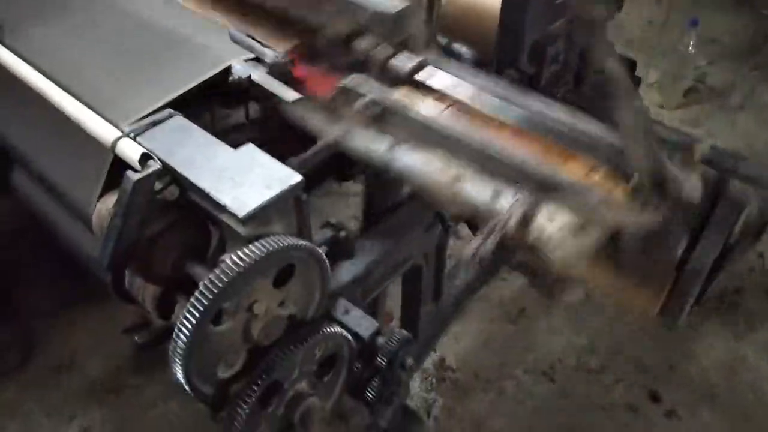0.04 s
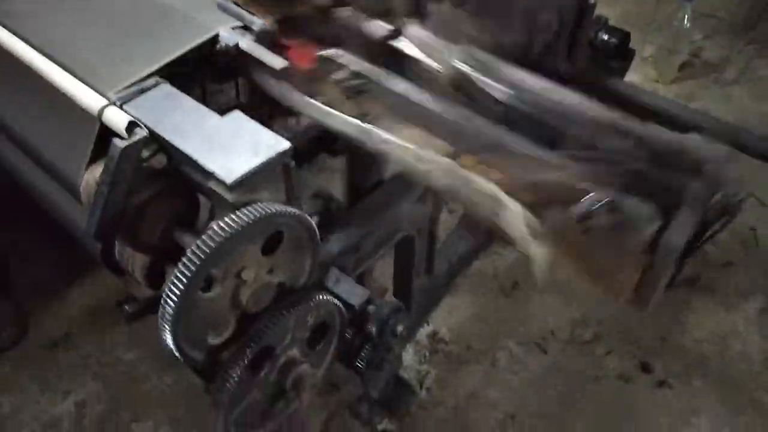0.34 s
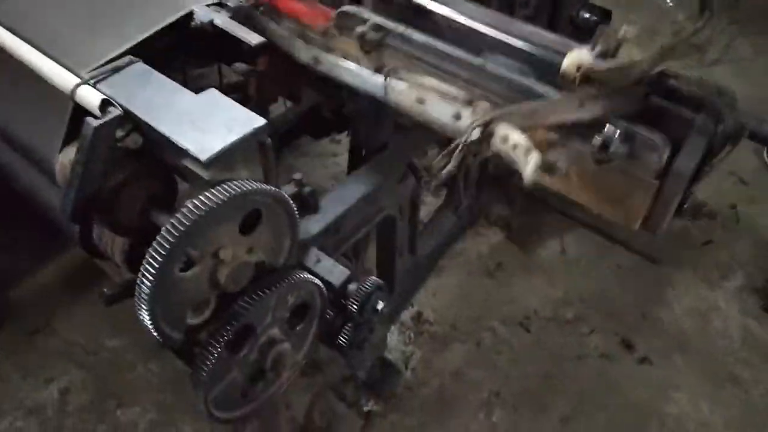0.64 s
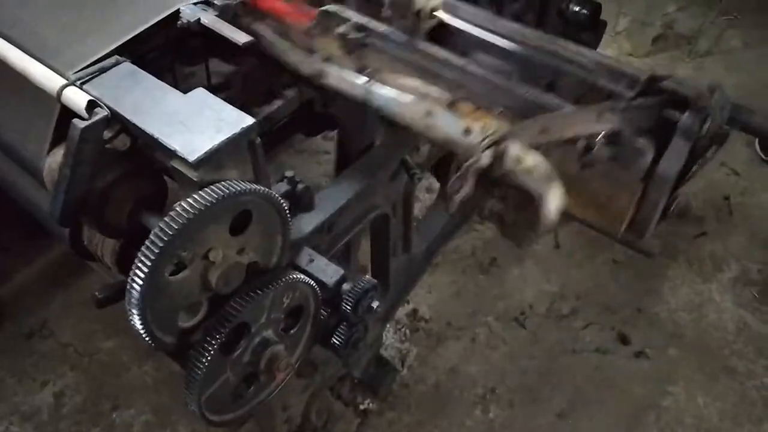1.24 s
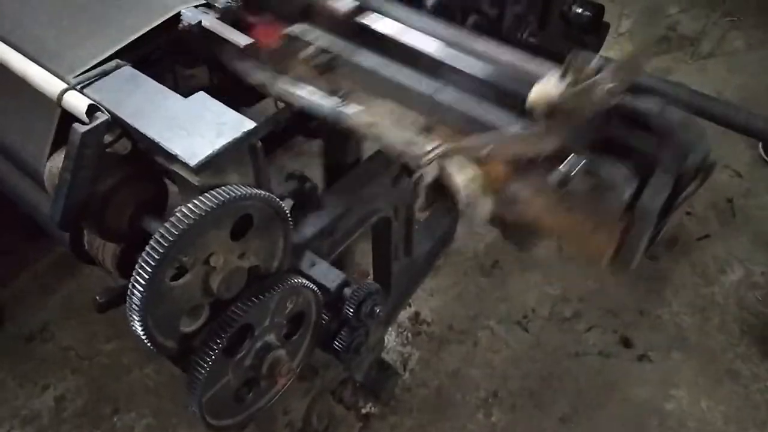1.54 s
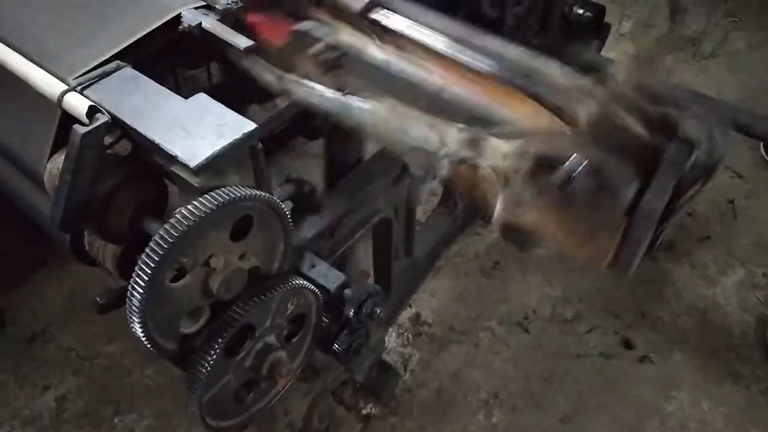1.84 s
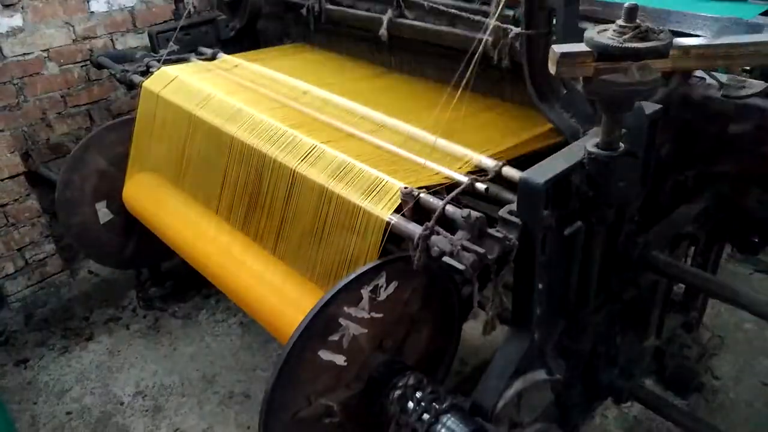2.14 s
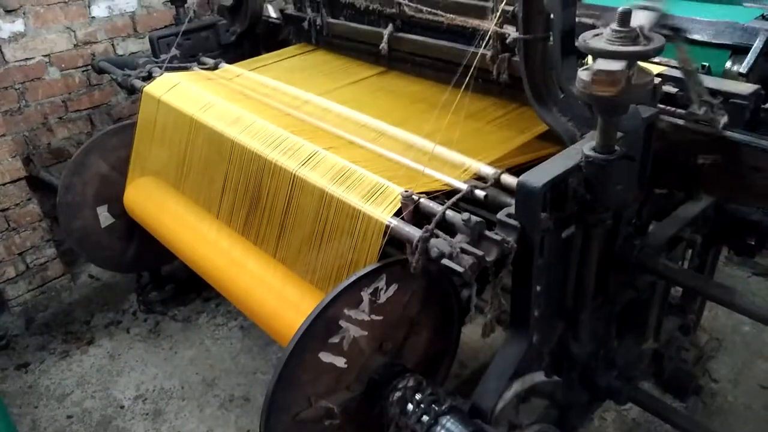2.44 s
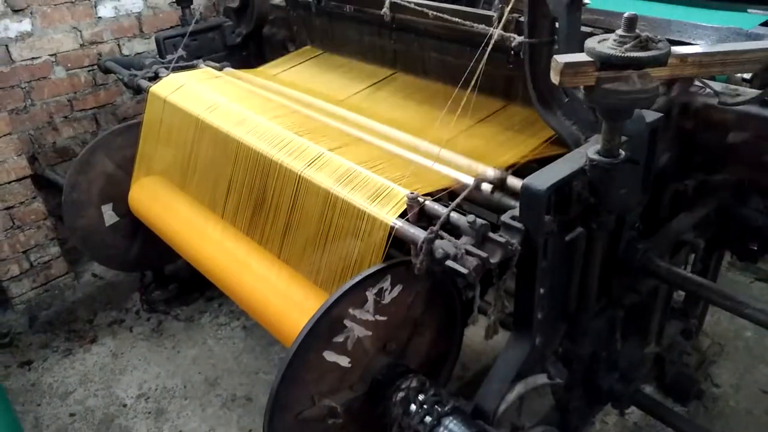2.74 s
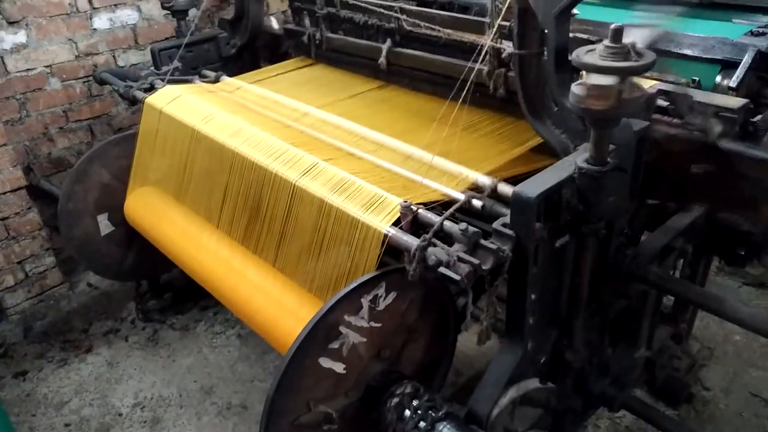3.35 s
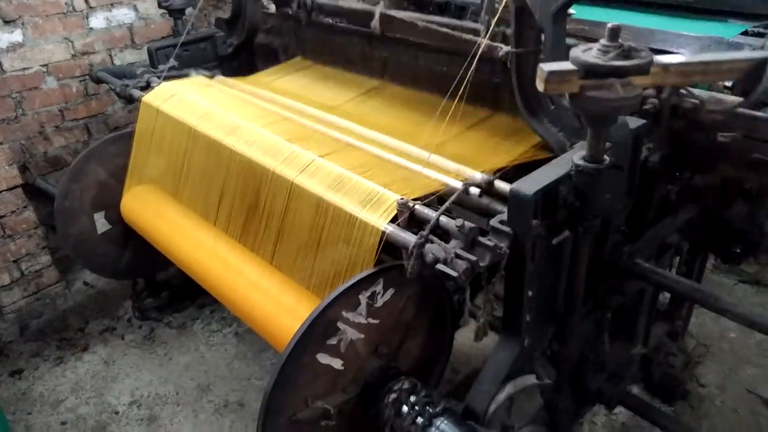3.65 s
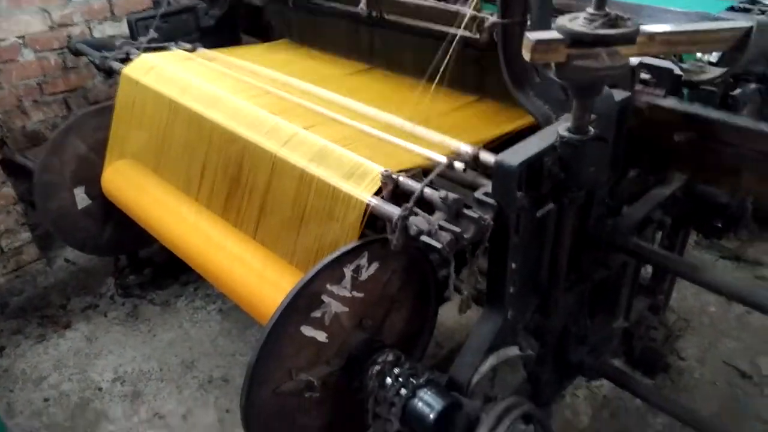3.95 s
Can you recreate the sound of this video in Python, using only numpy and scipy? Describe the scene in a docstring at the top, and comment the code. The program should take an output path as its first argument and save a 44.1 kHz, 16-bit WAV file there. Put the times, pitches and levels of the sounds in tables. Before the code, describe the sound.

Power looms clatter loudly in a workshop, cutting out briefly before the clatter resumes.

```python
"""Two shuttle looms clatter in a hard-walled weaving shed, one after the other, a short silence between.
Each pick, about two a second, is a round of clacks from picking sticks, shuttle and sley, with steel
pings, shuttle-box clanks and frame thumps, over loose heddles and the din of the other machines.
The microphone rings in the treble and overloads; at the second loom its right side is muffled."""
import sys
import numpy as np
from scipy import signal
from scipy.fft import rfft, irfft, next_fast_len
from scipy.io import wavfile
from scipy.ndimage import map_coordinates

SR = 44100
rng = np.random.default_rng(int(sys.argv[2]) if len(sys.argv) > 2 else 0)


def persist_wave(psi):
    """Save psi, clipped to +-1, as 16-bit WAV."""
    counts = np.round(np.clip(psi, -1, 1) * 32767).astype(np.int16)
    wavfile.write(sys.argv[1], SR, np.atleast_2d(counts).T)


N = 176400
SECOND_LOOM_S = 2.1


def amp(db):
    """Decibels to gain."""
    return 10 ** (np.asarray(db) / 20)


def unit(x):
    """Scale to rms 1."""
    return x / np.sqrt(np.mean(x ** 2) + 1e-20)


def clock():
    """Sample times in seconds."""
    return np.arange(N) / SR


def add(out, start_s, sound):
    """Mix a stereo sound into out."""
    part = out[:, int(start_s * SR):][:, :sound.shape[1]]
    part += sound[:, :part.shape[1]]


def along(points, hz):
    """Interpolate (freq_hz, value) points on a log axis."""
    freq_hz, values = np.transpose(points)
    return np.interp(np.log(hz + 1), np.log(freq_hz + 1), values)


def filtered(x, response):
    """Apply response(hz) by FFT."""
    size = next_fast_len(N + SR // 2)
    return irfft(rfft(x, size) * response(np.fft.rfftfreq(size, 1 / SR)), size)[..., :N]


def broad(points):
    """Smooth response through (freq_hz, gain_db) points."""
    return lambda hz: amp(along(points, hz))


def ribbed(points, ripple_db, spacing_hz):
    """Broad response with crowded, irregular resonances."""
    knots = rng.standard_normal(2000)
    ripple = lambda hz: map_coordinates(knots, [hz / spacing_hz], mode="mirror")
    return lambda hz: amp(along(points, hz) + ripple_db * ripple(hz))


def resonant(modes):
    """Response of resonances summed in power."""
    return lambda hz: np.sqrt(sum(
        np.abs(amp(db) * hz * width_hz / (centre_hz ** 2 - hz ** 2 + 1j * hz * width_hz)) ** 2
        for centre_hz, width_hz, db in modes))


def diffuse(response):
    """Reverberant stereo noise, rms 1, alike on both sides only in the bass."""
    # freq_hz, left_right_correlation
    likeness = [(60, 0.78), (130, 0.83), (290, 0.57), (640, 0.43), (1410, -0.2), (3100, 0.066),
                (7000, -0.015)]

    def mid_side(hz):
        angle = np.arccos(np.clip(along(likeness, hz), -1, 1)) / 2
        return response(hz) * np.array([np.cos(angle), np.sin(angle)])

    mid, side = filtered(rng.standard_normal((2, N)), mid_side)
    return unit(np.array([mid + side, mid - side]))


def blurred(pitch_hz, width_hz, t):
    """Stereo tone, rms 1, wandering in strength and phase."""
    knots = rng.standard_normal((2, 800)) + 1j * rng.standard_normal((2, 800))
    wander = np.array([np.interp(t * width_hz, np.arange(len(side)), side) for side in knots])
    return unit(np.real(wander * np.exp(2j * np.pi * pitch_hz * t)))


def strike(age_s, attack_s, t60_s):
    """Envelope of one blow building up and dying away."""
    return (1 - np.exp(-age_s / attack_s)) * np.exp(-np.log(1000) * age_s / t60_s)


def ring(pitch_hz, width_hz, attack_s, t60_s):
    """One struck mode, blurred by the shed's echoes."""
    t = np.arange(SR // 4) / SR
    return blurred(pitch_hz, width_hz, t) * strike(t, attack_s, t60_s)


def blows(starts_s, levels_db, attack_s, t60_s):
    """Envelope of many blows; powers add."""
    power, t = np.zeros(N), clock()
    for start_s, level_db in zip(starts_s, levels_db):
        first = max(int(start_s * SR), 0)
        span = slice(first, first + SR // 2)
        age_s = np.maximum(t[span] - start_s, 0)
        power[span] += (amp(level_db) * strike(age_s, attack_s, t60_s)) ** 2
    return np.sqrt(power)


def struck(starts_s, levels_db, spectrum, attack_s, t60_s, parts):
    """Blows land on several parts in turn, each with its own resonances."""
    out = np.zeros((2, N))
    for k in range(parts):
        envelope = blows(starts_s[k::parts], levels_db[k::parts], attack_s, t60_s)
        out += envelope * diffuse(ribbed(spectrum, ripple_db=2.5, spacing_hz=172.3))
    return out


def rattle(rate_per_s=150, t60_s=0.04, spread_db=1.5, share=0.28):
    """Envelope, rms 1, of small random contacts between loose parts."""
    contacts = (rng.random(N) < rate_per_s / SR) * amp(spread_db * rng.standard_normal(N)) ** 2
    decay = np.exp(-2 * np.log(1000) * clock()[:SR // 4] / t60_s)
    power = np.abs(signal.fftconvolve(contacts, decay)[:N])
    return np.sqrt(1 - share + share * power / power.mean())


def shed():
    """Gears and other looms merge into a rattling din over the drive's wavering hum."""
    # din around each loom: freq_hz, density_db
    first_spectrum = [(25, -26.5), (45, -24.5), (80, -5.5), (115, 1.5), (160, -4), (400, -2), (800, .5),
                      (1400, 0.5), (2400, 0.5), (4000, -4), (6000, -8.5), (8500, -6.5), (12000, -14),
                      (15500, -22.5)]
    second_spectrum = [(25, -24), (45, -9), (80, -5), (120, -1.5), (200, -2), (430, 0.5), (750, -2),
                       (1200, 2.8), (2000, 1), (2900, 2.5), (5000, -4), (8200, -3.5), (12000, -11.5),
                       (15500, -16.5)]
    ripple_db, spacing_hz = 1.5, 35.18
    first = amp(-14.5) * diffuse(ribbed(first_spectrum, ripple_db, spacing_hz))
    second = amp(-12.5) * diffuse(ribbed(second_spectrum, ripple_db, spacing_hz))
    din = np.where(clock() < SECOND_LOOM_S, first, second) * rattle()
    hum = amp(-44) * blurred(pitch_hz=113.8, width_hz=35, t=clock())[0]
    return din + hum


def chatter(rate_per_s=45, centre_hz=1509, spread_oct=0.6, level_db=-23.5, spread_db=0.5):
    """Loose heddles and links knock at random, each at its own pitch."""
    out, count = np.zeros((2, N)), int(rate_per_s * N / SR)
    starts_s = rng.random(count) * N / SR
    scatter = np.clip(rng.standard_normal((count, 2)), -2, 2)
    for start_s, (detune, softness) in zip(starts_s, scatter):
        knock = ring(centre_hz * 2 ** (spread_oct * detune), width_hz=540, attack_s=0.0015, t60_s=0.11)
        add(out, start_s, amp(level_db - spread_db * softness) * knock)
    return out


def frame():
    """The swinging sley shakes the frame: it thuds on the floor and its cast iron knocks."""
    # start_s, thud_db, knock_db
    thumps = [(0.017, -18.5, -27.5), (.12, -31, -20.5), (0.249, -18.5, -28), (.40, -37, -21),
              (0.491, -18.5, -18.5), (0.566, -18, -14), (.712, -19.5, -12.5), (.748, -23, -25),
              (.885, -23.5, -31), (0.986, -22.5, -20), (1.20, -29, -24), (1.444, -26.5, -15),
              (1.493, -18.5, -16.5), (1.535, -18.5, -29.5), (1.623, -24, -15), (1.699, -23, -18),
              (2.379, -14, -27), (2.48, -23.5, -16), (2.861, -22, -33), (2.935, -32, -43),
              (3.26, -21.5, -28), (3.335, -17, -30), (3.559, -27.5, -35), (3.895, -22, -32)]
    # centre_hz, width_hz, gain_db
    thud_modes = [(57, 14, -19.5), (112, 53, -1), (175, 54, -4), (222, 77, -8)]
    iron_modes = [(275, 36, -0.5), (328, 20, -1.5), (450, 30, -5.5), (569, 13, 2.5), (637, 8.3, -1),
                  (750, 45, 0), (880, 60, -3)]
    start_s, thud_db, knock_db = np.transpose(thumps)
    thud = blows(start_s, thud_db, attack_s=0.0095, t60_s=0.26) * diffuse(resonant(thud_modes))
    knock = blows(start_s, knock_db, attack_s=0.0095, t60_s=0.33) * diffuse(resonant(iron_modes))
    return thud + knock


def pings():
    """The shuttle's steel fittings ring high and briefly when struck."""
    # start_s, level_db
    hits = [(.172, -19), (.855, -14), (1.165, -11), (1.254, -22), (1.85, -16), (2.79, -13), (3.105, -13)]
    # centre_hz, width_hz, gain_db
    steel_modes = [(7520, 180, -4.5), (10800, 70, 1), (12150, 120, 5), (13760, 220, -5.5),
                   (15500, 150, -4.5)]
    start_s, level_db = np.transpose(hits)
    return blows(start_s, level_db, attack_s=0.004, t60_s=0.25) * diffuse(resonant(steel_modes))


def linkage():
    """Levers, rods and springs each ring at their own pitch."""
    # start_s, pitch_hz, level_db
    hits = [(0.27, 1332, -14), (.305, 3500, -14.5), (.375, 3844, -17), (1.243, 7000, -14),
            (1.365, 1543, -23), (1.369, 9950, -20), (1.415, 2003, -17.5), (1.462, 654, -14),
            (1.505, 578, -18), (1.755, 2350, -13), (1.84, 7300, -21), (2.702, 9070, -12.5),
            (2.72, 6373, -18), (3.055, 1536, -22), (3.175, 2260, -13.5), (3.437, 6670, -15),
            (3.474, 1088, -17), (3.67, 9010, -17.5), (3.774, 1763, -19), (3.837, 1189, -12)]
    out = np.zeros((2, N))
    for start_s, pitch_hz, level_db in hits:
        add(out, start_s, amp(level_db) * ring(pitch_hz, width_hz=170, attack_s=0.004, t60_s=0.28))
    return out


def shuttle_box():
    """The box clanks as it catches the shuttle, at a different pitch each time."""
    # start_s, pitch_hz, level_db
    catches = [(0.609, 2950, -9), (1.081, 2625, -13.5), (1.088, 2906, -12), (1.09, 2057, -19.5),
               (1.567, 2997, -11), (2.445, 2823, -11), (2.903, 2976, -10), (2.967, 3020, -13.5),
               (3.099, 2676, -10.5), (3.39, 2780, -11), (3.865, 2800, -11)]
    # pitch_ratio, gain_db
    box_modes = [(.73, -9), (0.871, -6), (1, -2.5), (1.082, -8), (1.351, -11.5), (2.1, -14.5)]
    out = np.zeros((2, N))
    for start_s, pitch_hz, level_db in catches:
        for ratio, gain_db in box_modes:
            mode = ring(pitch_hz * ratio, width_hz=140, attack_s=0.003, t60_s=0.25)
            add(out, start_s, amp(level_db + gain_db) * mode)
    return out


def snaps():
    """Steel hits steel close by, standing out briefly ahead of the echoes."""
    # start_s, level_db
    hits = [(.177, -14), (0.301, -8), (.612, -15), (0.862, -10), (1.079, -17), (1.173, -10), (1.259, -12),
            (1.855, -8), (2.785, -9), (3.074, -12), (3.104, -8), (3.383, -13), (3.576, -12), (3.79, -13)]
    # freq_hz, gain_db
    spectrum = [(500, -24.5), (2500, -5), (5000, 2), (8000, 2.5), (12000, 3.5), (15500, -1)]
    start_s, level_db = np.transpose(hits)
    return blows(start_s, level_db, attack_s=0.0015, t60_s=0.063) * diffuse(broad(spectrum))


def clacks():
    """Picking sticks, shuttle and sley strike: wooden body and hard crack, roughened by loose parts."""
    # start_s, body_db, crack_db
    hits = [(-.02, -20.5, -16), (.055, -23, -21), (0.084, -12.5, -9), (.122, -6, -5), (.148, -20, -13),
            (.175, -15.5, -8), (0.264, -7.5, -9.5), (0.301, -14, -2), (0.373, -9, -5.5), (.435, -16, -17),
            (0.514, -22, -12), (.565, -13, -12), (0.605, -10.5, -7.5), (0.659, -11.5, -9),
            (.715, -10.5, -31), (0.789, -11, -1), (.846, -11, -2.5), (.948, -31, -12), (1.028, -17, -8.5),
            (1.079, -7, -3.5), (1.142, -20.5, -5.5), (1.227, -7, -11.5), (1.253, -10, -4),
            (1.366, -9, -7.5), (1.511, -11, -12), (1.566, -7.5, -5), (1.617, -21, -11.5),
            (1.688, -11, -14.5), (1.746, -15, -1), (1.839, -6.5, -7.5), (2.425, -7, -3), (2.52, -19, -8),
            (2.601, -11.5, -5), (2.628, -5, -4.5), (2.666, -14, -1), (2.784, -13, -1), (2.85, -12, -13),
            (2.889, -6.5, -3), (2.971, -10, -10), (3.025, -13, -11), (3.074, -11, -5), (3.108, -11.5, -4.5),
            (3.17, -19, -5), (3.3, -10.5, -4), (3.35, -10, -18), (3.383, -8.5, -2.5), (3.46, -9.5, -15),
            (3.545, -15.5, -11), (3.577, -10.5, -3.5), (3.625, -9, -2), (3.782, -9.5, -1.5),
            (3.856, -5, -4.5), (3.934, -8.5, -11)]
    # freq_hz, gain_db
    body_spectrum = [(100, -25.5), (400, -20.5), (900, -5), (1500, -3), (2500, 1), (4000, -6),
                     (7000, -18.5), (15000, -36.5)]
    crack_spectrum = [(200, -28.5), (1500, -8), (4000, 6), (7000, 6), (10000, 4.5), (12000, 0),
                      (15500, -0.5)]
    start_s, body_db, crack_db = np.transpose(hits)
    body = struck(start_s, body_db - 4, body_spectrum, attack_s=0.004, t60_s=0.39, parts=4)
    crack = struck(start_s, crack_db - 5.5, crack_spectrum, attack_s=0.007, t60_s=0.33, parts=3)
    return body * rattle() + crack * rattle()


def dips(onset_s=0.003, recovery_s=0.049):
    """Gain that drops abruptly and recovers."""
    # start_s, strength_db
    drops = [(2.708, 5), (3.666, 1)]
    start_s, strength_db = np.transpose(drops)
    age_s = np.maximum(clock()[:, None] - start_s, 0)
    shape = (1 - np.exp(-age_s / onset_s)) * np.exp(-age_s / recovery_s)
    return amp(-shape @ strength_db)


def scene():
    """Each near loom in turn, inside the din of the shed."""
    loom = clacks() + snaps() + shuttle_box() + linkage() + pings() + chatter() + frame()
    return (loom + shed()) * dips()


def port(hz, centre_hz, width_hz, boost_db):
    """Treble resonance of one microphone port."""
    return np.sqrt(1 + (amp(boost_db) ** 2 - 1) / (1 + (2 * (hz - centre_hz) / width_hz) ** 2))


def first_ports(hz):
    """Microphone response at the first loom: both ports ring, balance mostly to the left."""
    # freq_hz, left_over_right_db
    balance = [(110, -0.5), (380, 1), (700, -1), (1290, 1.3), (2400, 6), (4400, 0.5), (8000, 4)]
    lean = amp(along(balance, hz) / 2)
    left = port(hz, centre_hz=9350, width_hz=630, boost_db=12.5) * lean
    right = port(hz, centre_hz=9820, width_hz=1240, boost_db=15.8) / lean
    return np.array([left, right])


def second_ports(hz):
    """Microphone response at the second loom: left rings, right is muffled as if covered."""
    # freq_hz, gain_db
    covered = [(60, -24), (110, 5), (200, -6.5), (380, -11.5), (750, -12.5), (1290, -18.5), (2400, -30),
               (4400, -32), (9000, -30.5), (15000, -31)]
    left = port(hz, centre_hz=9220, width_hz=1040, boost_db=14.5)
    return np.array([left, amp(along(covered, hz))])


def fades(return_s=2.322, rise_s=0.29):
    """Gain: quick fade out of the first loom, slower fade in of the second."""
    # time_s, gain_db
    fade_points = [(1.886, 1.5), (1.892, -11), (1.902, -13), (1.92, -52), (1.95, -110)]
    t = clock()
    fade_out = amp(np.interp(t, *np.transpose(fade_points)))
    fade_in = (t > return_s) * np.clip(0.063 + (t - return_s) / rise_s, 0, 1)
    return fade_out + fade_in


def record(dry):
    """Port colour, soft overload, fades, band limit."""
    hardness, top_hz, edge_hz = 3.3, 15800, 150
    coloured = np.where(clock() < SECOND_LOOM_S, filtered(dry, first_ports), filtered(dry, second_ports))
    clipped = coloured / (1 + np.abs(coloured) ** hardness) ** (1 / hardness)
    band_limit = lambda hz: np.sin(np.pi / 2 * np.clip((top_hz - hz) / edge_hz, 0, 1)) ** 2
    return filtered(clipped * fades(), band_limit)


dry = scene()
out = record(dry)
persist_wave(out)
```